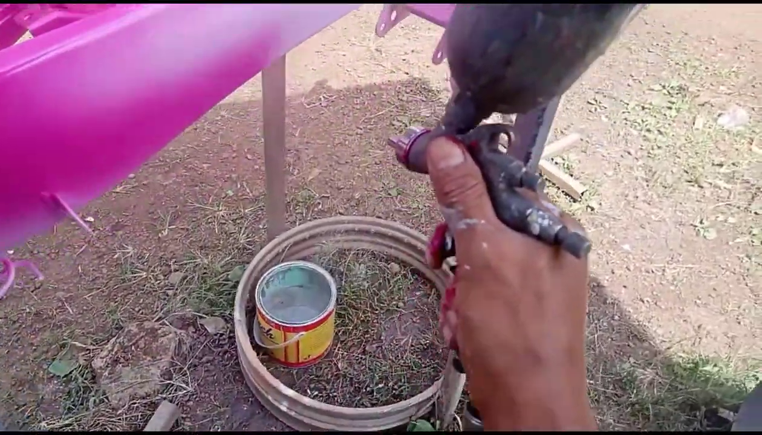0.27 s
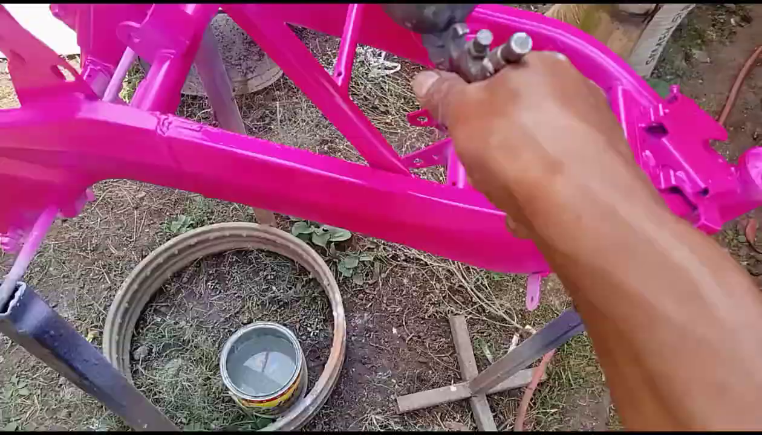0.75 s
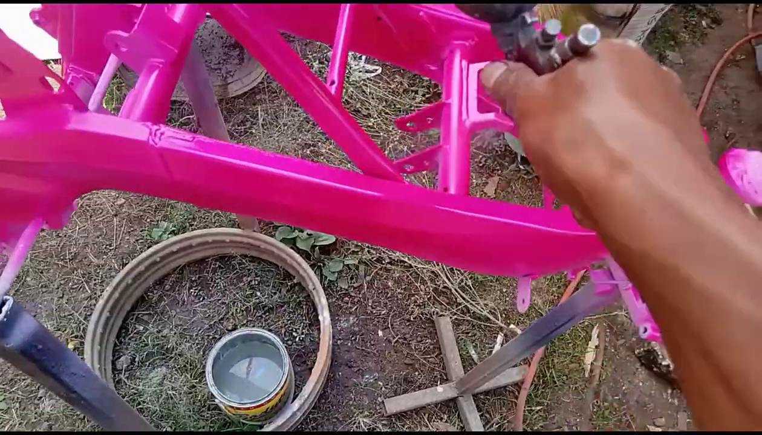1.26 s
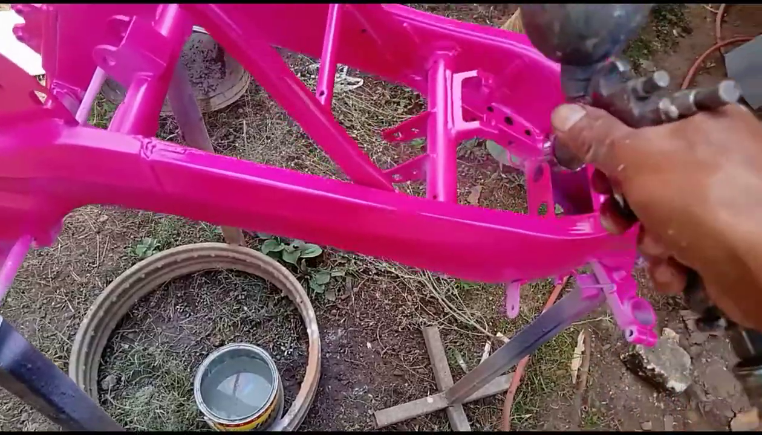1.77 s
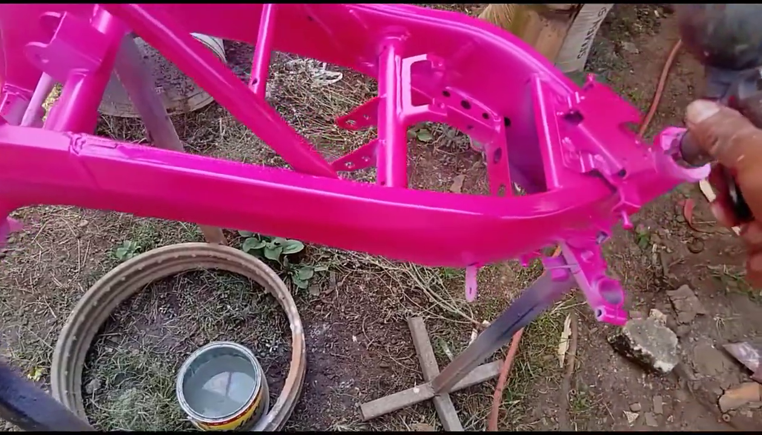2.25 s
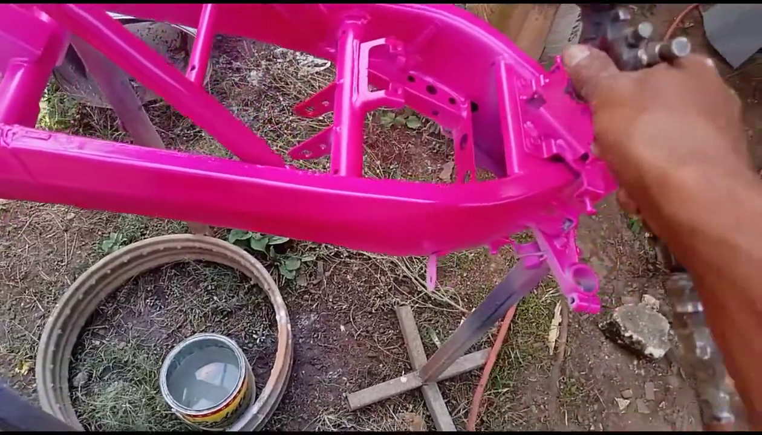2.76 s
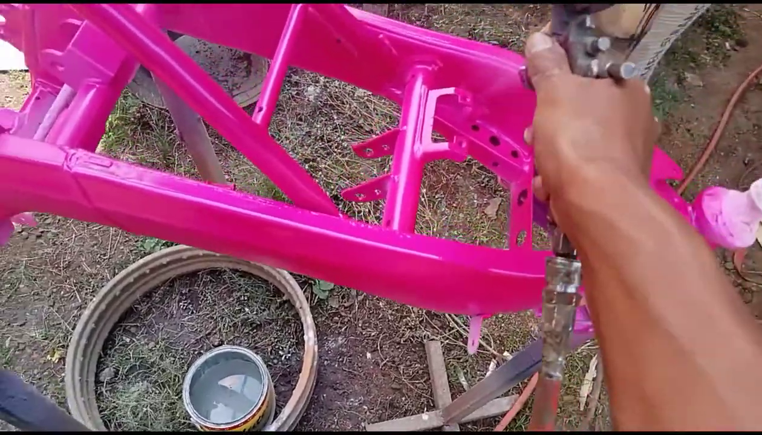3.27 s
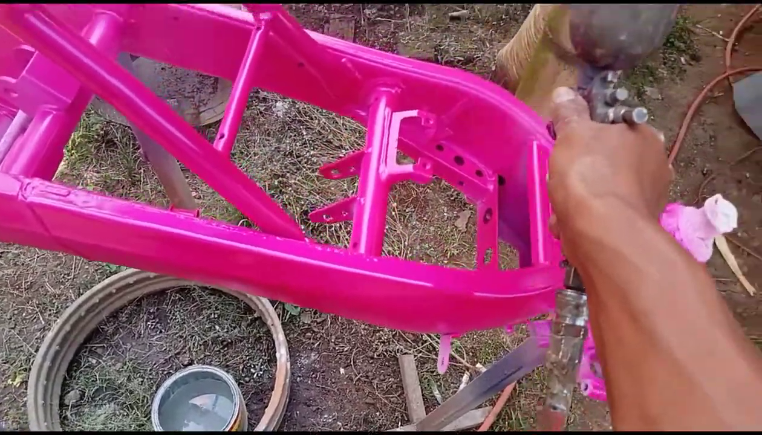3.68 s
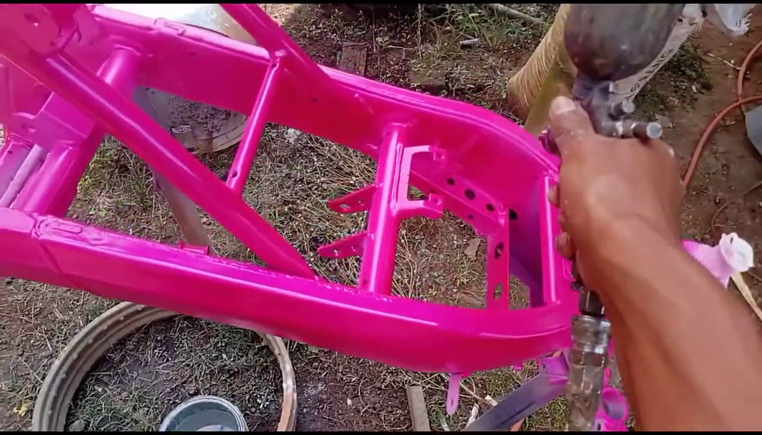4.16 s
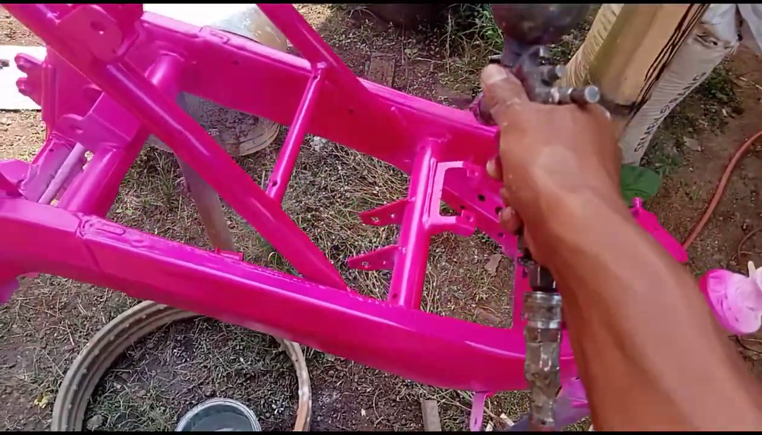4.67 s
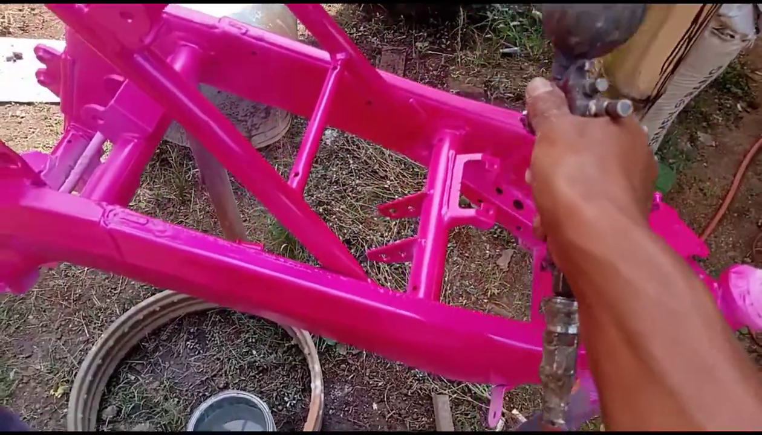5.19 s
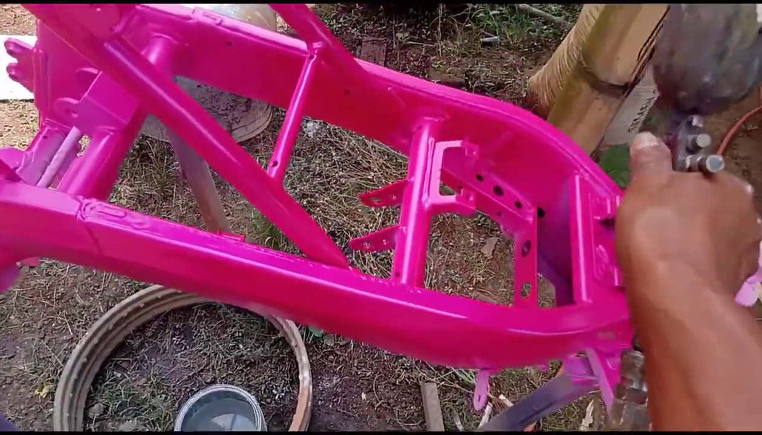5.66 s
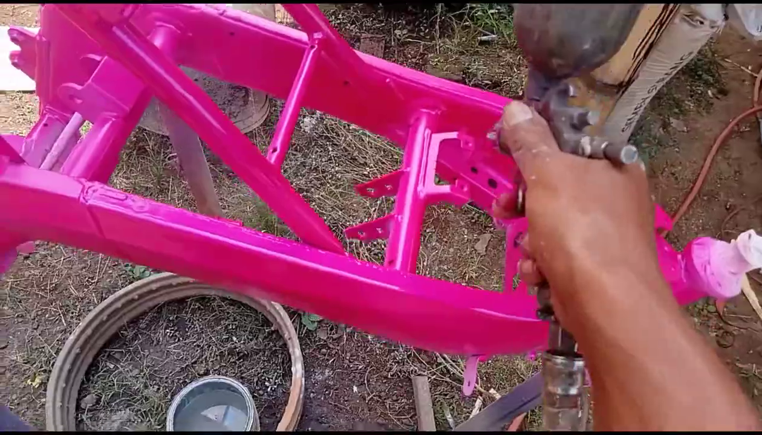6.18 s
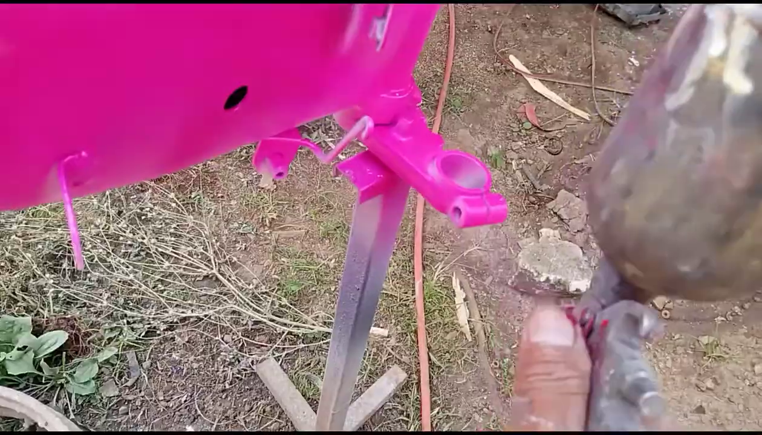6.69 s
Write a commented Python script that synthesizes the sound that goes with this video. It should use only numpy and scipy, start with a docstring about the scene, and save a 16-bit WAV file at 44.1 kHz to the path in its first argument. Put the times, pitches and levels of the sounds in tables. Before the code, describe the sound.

Outdoors, close and dry, a compressed-air spray gun is already blowing at 0 s: a bright, dense, sharp hiss over low air roar, with soft compressor knocks about ten times a second. At about 0.68 s everything cuts dead to near silence. From 0.78 s it swells back within a fraction of a second, a little darker and softer, and holds until 6.28 s. The hiss gently rises and falls, with airy high whistles as it grazes edges, short breathy hollow notes near 1.3, 1.6, 1.9, 4.7 to 5.3 and 6.2 s, and tiny dry grit ticks around 3.0 and 3.2 s. Beneath, a faint distant engine drops, revs up by 4 s, then slows into a deeper hum. After another abrupt near-silent gap, a stronger, fuller hiss swells in around 6.48 s, brightest near 6.84 s, and runs to the end at 7 s.

```python
"""A compressed-air spray gun paints a motorcycle frame outdoors; its jet is noise in rush, hiss and fizz bands.
It whistles on the frame's edges, hoots in open tubes, rings narrow modes, flicks grit and roars low down.
Underneath, a compressor chugs ten times a second in struck knocks.
A distant engine, built from sine harmonics, speeds up and slows down.
All is heard in three stretches: one is sounding at the start, two swell in; the first two are cut off dead."""
import sys
import numpy as np
from scipy import signal
from scipy.fft import rfft, irfft
from scipy.io import wavfile
from scipy.ndimage import uniform_filter1d

SR = 44100
rng = np.random.default_rng(int(sys.argv[2]) if len(sys.argv) > 2 else 0)


def master(y):
    """Save y as 16-bit WAV."""
    cut = np.clip(np.atleast_2d(y).T, -1, 1)
    pcm = np.round(cut * 32767)  # scale
    wavfile.write(sys.argv[1], SR, pcm.astype(np.int16))


N = 305613
TIME = np.arange(N) / SR
# the grid on which noise is painted: short slices of time by frequency bins
FFT_SIZE, HOP = 1024, 256
SLICE_S = np.arange(N // HOP + 5)[:, None] * HOP / SR
BIN_HZ = np.fft.rfftfreq(FFT_SIZE, 1 / SR)


def amp(db):
    """Decibels to gain."""
    return 10 ** (np.asarray(db) / 20)


def evened(x):
    """Scales to rms 1."""
    return x / np.sqrt(np.mean(x ** 2) + 1e-20)


def spectrum(points):
    """Reads a spectrum in dB at every bin, along a log frequency axis."""
    hz, db = np.transpose(points)
    return np.interp(np.log(BIN_HZ + 1), np.log(hz), db)


def follow(rows, t):
    """Reads each column of a curve at the times t."""
    s, *columns = np.transpose(rows)
    return [np.interp(t, s, column) for column in columns]


def bell(x, centre, width):
    """A smooth hump, half as high at the ends of its width."""
    return 2 ** -((2 * (x - centre) / width) ** 2)


def during(span, t, margin=0.045):
    """True within the span, widened by a small margin."""
    return (t >= span[0] - margin) & (t < span[1] + margin)


def wander(rate_hz):
    """Smooth random movement of rms 1, its spectrum halved in amplitude at rate_hz."""
    lowpass = bell(np.fft.rfftfreq(N, 1 / SR), 0, 2 * rate_hz)
    return evened(irfft(rfft(rng.standard_normal(N)) * lowpass, N))


def eddies(size):
    """Random patches of rms 1, size = (slices, bins) across."""
    patches = rng.standard_normal((len(SLICE_S), len(BIN_HZ)))
    patches = uniform_filter1d(patches, size[0], 0)
    return evened(uniform_filter1d(patches, size[1], 1))


def noise(gain):
    """Noise whose strength in each slice and bin follows gain."""
    grains = rng.standard_normal((len(SLICE_S), len(BIN_HZ), 2)) @ [1, 1j]
    return signal.istft((grains * gain).T, nperseg=FFT_SIZE, noverlap=FFT_SIZE - HOP)[1][:N]


# a stretch opens quietly just before its start, then swells, fast at first and easing into full level
OPEN_S, OPEN_DB, SWELL_S, SWELL_EASE = 0.018, -43.5, 0.17, 1.34
# at the cut the sound drops at once and the rest dies away
CUT_S, CUT_DB, TAIL_DB_PER_S = 0.002, -25.5, 1398


def fade(start, cut):
    """The gain of one stretch: it opens, swells, holds and is cut off dead."""
    since, after = TIME - start, np.maximum(TIME - cut, 0)
    opening = np.clip(1 + since / OPEN_S, 0, 1) ** 2
    swell_db = OPEN_DB * np.clip(1 - since / SWELL_S, 0, 1) ** SWELL_EASE
    cut_db = CUT_DB * np.minimum(after / CUT_S, 1) - TAIL_DB_PER_S * after
    return opening * amp(swell_db + cut_db)


# the three stretches of sound [swell starts t/s, cut t/s]; the outer ends lie beyond what is heard
STRETCHES = [(-0.3, 0.679), (0.776, 6.279), (6.477, 7.0)]


def stretches():
    """The gain of all the stretches in turn, near silence between them."""
    return sum(fade(start, cut) for start, cut in STRETCHES)


# quieter below full speed (firings/s, dB per firing/s)
FULL_RATE, DB_PER_RATE = 36.8, 0.5
# it booms where a harmonic crosses the exhaust's resonance
EXHAUST_HZ, EXHAUST_WIDTH_HZ, EXHAUST_DB = 137.4, 14, 8.5
# the distant engine's speed [t/s, firing rate f/Hz before waver]
ENGINE_SPEED = [(0.68, 32), (1.1, 23.7), (2.3, 32.7), (2.7, 34.6), (3.1, 36.2), (4.3, 36.8), (5.45, 36.3),
                (5.85, 34.2), (6.28, 31.6), (6.6, 32.4), (6.93, 33.4)]
# how loud the engine is and how far its bass swells [t/s, level/dB, swell level/dB], both relative
ENGINE_LEVEL = [(0.68, -16, 15), (1.0, -4.5, 1), (2.6, 0.5, -7), (3.5, -4.5, -1), (4.5, 2, -14),
                (5.45, 2.5, -4), (5.8, 0.5, 17), (6.28, -1, 18), (6.7, 3, 25)]
# the engine's harmonics [multiple of the firing rate, base level/dB, share of the bass swell 0-1]
ENGINE_HARMONICS = [(2, -60, .35), (3, -63, 0.99), (4, -53.5, 0.41), (5, -53, .25), (6, -46, .1),
                    (7, -56.5, 0.2)]


def engine(waver=0.0029, rough_db=2.5):
    """Only the low harmonics of a slow engine carry this far; they deepen and soften as it slows."""
    rate = follow(ENGINE_SPEED, TIME)[0]
    engine_db, swell_db = follow(ENGINE_LEVEL, TIME)
    cycles = np.cumsum(rate * (1 + waver * wander(7.4))) / SR
    speed_db = DB_PER_RATE * (rate - FULL_RATE)
    out = np.zeros(N)
    for multiple, db, share in ENGINE_HARMONICS:
        exhaust_db = EXHAUST_DB * bell(multiple * rate, EXHAUST_HZ, EXHAUST_WIDTH_HZ)
        level_db = db + engine_db + speed_db + share * swell_db + exhaust_db
        tone = np.sin(2 * np.pi * (multiple * cycles + rng.random()))
        out += amp(level_db + rough_db * wander(9.8)) * tone
    return np.sqrt(2) * out  # a sine of rms 1 for each level


# the compressor's strokes in each stretch [first stroke t/s, stroke rate f/Hz]
COMPRESSOR_STROKES = [(-0.002, 10.0), (0.8096, 10.033), (6.49, 10.0)]
# how loud the compressor runs in each stretch [rms level/dB before the fades]
COMPRESSOR_DB = [-44.5, -45.5, -55]
# valve and piston knocks within one stroke [delay t/s, f/Hz, relative level/dB, decay t/s]
KNOCKS = [(0.00091, 305.7, 0.5, 0.0035), (0.012, 303, -12, 0.009), (0.064, 223, -11.5, 0.0058),
          (0.06, 120, -16, 0.014), (0.073, 372.3, -6.5, 0.0047), (0.064, 390, -11, 0.0021)]


def compressor(uneven_db=1.04):
    """Each piston stroke is a short run of soft, low knocks, struck a little unevenly."""
    t = TIME[:SR // 4]
    out = np.zeros(N)
    for span, (first, rate), level_db in zip(STRETCHES, COMPRESSOR_STROKES, COMPRESSOR_DB):
        strokes = first + np.arange(70) / rate
        chug = np.zeros(N)
        for delay, hz, db, decay in KNOCKS:
            at = np.round((strokes + delay) * SR).astype(int)
            at = at[(at >= 0) & (at < N)]
            blows = np.zeros(N)
            blows[at] = amp(db + uneven_db * rng.standard_normal(len(at)))
            # a soft onset, then a decaying ring
            ring = (t / decay) ** 2 * np.exp(-t / decay) * np.sin(2 * np.pi * hz * t)
            chug += signal.oaconvolve(blows, ring)[:N]
        on = during(span, TIME)
        out[on] = amp(level_db) * evened(chug[on])
    return out


# low turbulence of the air [f/Hz, relative level/dB]
ROAR_SPECTRUM = [(25, -22.5), (50, -16.5), (90, -6.5), (135, 1.5), (250, 2.5), (420, 3), (520, -2.5),
                 (640, -3), (860, -4.5), (1150, 1.5), (1450, -2), (2000, -2.5), (2600, -11), (4000, -36.5)]
# how loud the turbulence is in each stretch [level/dB before the fades]
ROAR_DB = [-41, -44, -37.5]


def roar(dip, patchy_db=1.7):
    """Low turbulence where the air strikes the frame: noise with patchy colour."""
    air = noise(dip * amp(spectrum(ROAR_SPECTRUM) + patchy_db * eddies(size=(10, 4))))
    return evened(air) * sum(amp(db) * during(span, TIME) for span, db in zip(STRETCHES, ROAR_DB))


# the frame's rings under the jet [f/Hz, spread to each side f/Hz, level/dB before the drive]
FRAME_RINGS = [(745, 10.4, -56), (766, 7.7, -57.5), (1138, 11, -57)]
# how hard the jet blows the rings [t/s, added level/dB]
FRAME_DRIVE = [(0.68, -2), (0.9, -9.5), (2.9, -0.7)]


def frame():
    """The jet keeps a few narrow modes of the frame ringing."""
    rings = np.zeros(N)
    for hz, spread_hz, db in FRAME_RINGS:
        shimmer = wander(spread_hz) + 1j * wander(spread_hz)
        rings += amp(db) * (shimmer * np.exp(2j * np.pi * hz * TIME)).real
    return rings * amp(follow(FRAME_DRIVE, TIME)[0])


# small ticks of grit on the frame [t/s, onset level/dB]
TICKS = [(2.98, -30), (3.167, -27.5)]


def ticks(t60=0.027, low_hz=1100, high_hz=3200):
    """Grit blown against the frame: short dry bursts of banded noise."""
    bursts = sum(amp(db - 60 * abs(TIME - s) / t60) * (TIME >= s) for s, db in TICKS)
    band = signal.butter(2, [low_hz, high_hz], "band", fs=SR, output="sos")
    return bursts * evened(signal.sosfilt(band, rng.standard_normal(N)))


TUBE_HZ = 514
# the jet blows across an open tube [middle t/s, half-height length t/s, level/dB]
HOOTS = [(1.274, 0.069, -45), (1.6, 0.15, -44), (1.856, 0.035, -34), (3.495, 0.21, -50.5),
         (4.74, 0.21, -43.5), (4.913, 0.081, -45), (5.305, 0.14, -42), (6.215, 0.053, -41)]


def hoots(width_hz=30, breathy=1.0):
    """An open tube sounds a short, breathy note as the jet crosses it."""
    breath = 1 + breathy * (wander(width_hz) + 1j * wander(width_hz))
    breath = breath / np.sqrt(1 + 2 * breathy ** 2)
    note = (breath * np.exp(2j * np.pi * TUBE_HZ * TIME)).real
    return note * sum(amp(db) * bell(TIME, s, length) for s, length, db in HOOTS)


# a narrow hollow in the noise drifts about during the second stretch
HOLLOW_HZ, HOLLOW_DRIFT_HZ, HOLLOW_WIDTH_HZ, HOLLOW_DB = 2060, 90, 160, -4.5


def hollow():
    """The drifting hollow, as a gain for each slice and bin."""
    centre = HOLLOW_HZ + HOLLOW_DRIFT_HZ * np.interp(SLICE_S, TIME, wander(3))
    return amp(HOLLOW_DB * during(STRETCHES[1], SLICE_S) * bell(BIN_HZ, centre, HOLLOW_WIDTH_HZ))


ECHO_MS, CLOSING_MS_PER_S, RIPPLE_DB = 0.904, 0.085, 0.6


def panel_echo():
    """In the first stretch a flat panel echoes the jet: a comb in dB, sliding upward as the gun closes in."""
    delay_s = (ECHO_MS - CLOSING_MS_PER_S * SLICE_S) / 1000
    return RIPPLE_DB * during(STRETCHES[0], SLICE_S) * np.cos(2 * np.pi * BIN_HZ * delay_s)


WHISTLE_WIDTH_HZ = 630
# the jet grazes an edge [middle t/s, half-height length t/s, f/Hz, boost level/dB]
WHISTLES = [(0.968, 0.29, 10300, 6.5), (1.079, 0.45, 5250, 6.5), (1.38, 0.18, 11100, 8),
            (2.601, 0.099, 11500, 8), (3.5, .14, 12600, 8), (3.983, 0.13, 10030, 9), (3.997, .16, 7160, 5),
            (4.7, .2, 13120, 7), (4.82, 0.22, 2940, 4.5), (4.85, 0.23, 10000, 7.5), (5.085, .28, 12800, 7)]


def whistles():
    """Edges lift narrow patches of the jet's noise into breathy whistles; returns the boost in dB."""
    return sum(db * bell(SLICE_S, s, length) * bell(BIN_HZ, hz, WHISTLE_WIDTH_HZ)
               for s, length, hz, db in WHISTLES)


# where rush, hiss and fizz lie [low f/Hz, high f/Hz]
BANDS = [(2300, 4400), (6300, 9200), (9800, 15000)]
# the jet's colour in each stretch [f/Hz, relative level/dB]
JET_1 = [(1120, -31.5), (1900, -15.5), (2280, -21), (2700, -10.5), (2970, -12.5), (3420, -13), (4080, -14),
         (4450, -15), (4860, -13), (5400, -6.5), (8020, 4), (9560, -4), (11100, -1.5), (14800, -6.5),
         (15500, -4)]
JET_2 = [(1120, -41), (1900, -20), (2130, -19), (2480, -7), (2800, -2.9), (3250, -1.45), (3920, -6),
         (4330, -10.5), (5600, -11), (6900, -3), (7850, 1.3), (9700, -11), (11600, -14), (13600, -13),
         (15300, -9)]
JET_3 = [(1120, -48), (1900, -26), (2090, -11), (2430, -2), (2560, 1), (2800, 1.5), (3450, 3), (4340, -5),
         (4650, -6), (5900, -9), (8460, -2), (10300, -8), (11800, -12), (13400, -9.5), (15500, -11)]
# the jet's bands in each stretch [t/s, rush level/dB, hiss level/dB, fizz level/dB], before the jet's trim
LEVELS_1 = [(0.03, -33, -24, -25), (0.098, -31.5, -24, -24), (0.66, -33, -25, -28)]
LEVELS_2 = [(0.97, -33, -33, -37), (1.0, -31, -32, -35.5), (1.51, -31.5, -29.5, -37.5),
            (1.69, -29.5, -28, -33.5), (2.03, -31, -27, -39), (2.53, -33.5, -29, -38.5),
            (2.68, -32, -25.5, -35.5), (2.93, -33, -30.5, -38.5), (3.73, -30.5, -30.5, -38.5),
            (3.97, -34, -30, -38.5), (4.21, -30.5, -28.5, -38), (4.54, -33.5, -31.5, -39.5),
            (4.77, -33, -31.5, -38), (5.08, -32.5, -32, -36.5), (5.32, -33.5, -31.5, -39.5),
            (5.61, -32, -28.5, -38.5), (6.11, -32.5, -30.5, -37.5), (6.26, -29, -29.5, -37)]
LEVELS_3 = [(6.63, -32, -26.5, -36), (6.842, -28, -23.5, -27), (6.9, -28, -25, -31.5)]


def jet(dip, patchy_db=1.06, fine_db=1.55, flutter_db=0.23, drift_db=0.23, trim_db=1.5):
    """Air tears through the nozzle: coloured noise whose three bands rise and fall."""
    field = np.zeros((len(SLICE_S), len(BIN_HZ)))
    # each band holds its own level and crossfades into its neighbours
    shares = [np.interp(BIN_HZ, np.ravel(BANDS), np.repeat(row, 2)) for row in np.eye(len(BANDS))]
    for span, colour, levels in zip(STRETCHES, (JET_1, JET_2, JET_3), (LEVELS_1, LEVELS_2, LEVELS_3)):
        shape_db = spectrum(colour)
        stretch_db = shape_db
        for band, share, level_db in zip(BANDS, shares, follow(levels, SLICE_S)):
            own_db = 10 * np.log10(np.sum(amp(shape_db[during(band, BIN_HZ)]) ** 2))
            stretch_db = stretch_db + share * (level_db - own_db)
        field += during(span, SLICE_S) * amp(stretch_db)
    # eddies colour the hiss in broad and fine patches
    eddies_db = patchy_db * eddies(size=(20, 7)) + fine_db * eddies(size=(5, 2))
    hiss = noise(field * dip * amp(whistles() + panel_echo() + eddies_db))
    # uneven paint flow and an unsteady hand shake all of it
    shake_db = flutter_db * wander(70) + drift_db * wander(7.5)
    return hiss * amp(trim_db + shake_db)


def scene():
    """All the layers sum in the open air, alike in both channels; the hollow cuts jet and roar together."""
    dip = hollow()
    background = engine() + compressor()
    on_the_frame = roar(dip) + frame() + ticks() + hoots()
    mono = background + on_the_frame + jet(dip)
    return np.array([mono, mono])


EDGE_HZ = 15500


def record(dry):
    """The whole scene fades in and is cut off by stretches; then a steep low-pass takes the top off."""
    faded = dry * stretches()
    lowpass = signal.firwin(1023, EDGE_HZ, window=("kaiser", 9), fs=SR)
    return signal.oaconvolve(faded, lowpass[None], "same", axes=1)


dry = scene()
out = record(dry)
master(out)
```